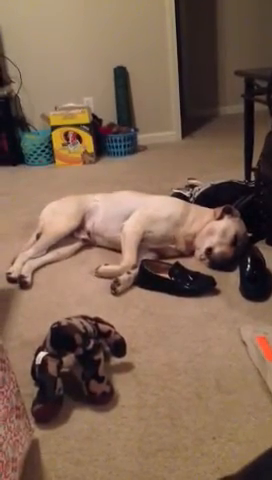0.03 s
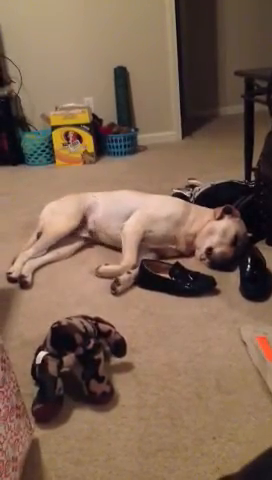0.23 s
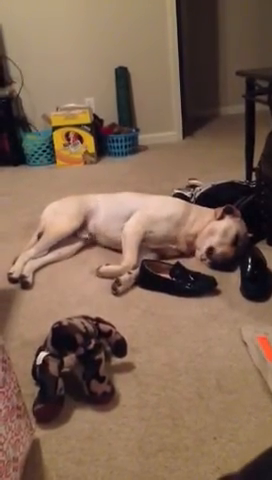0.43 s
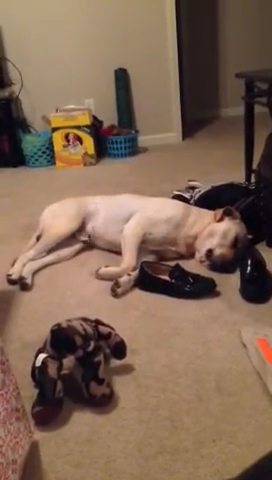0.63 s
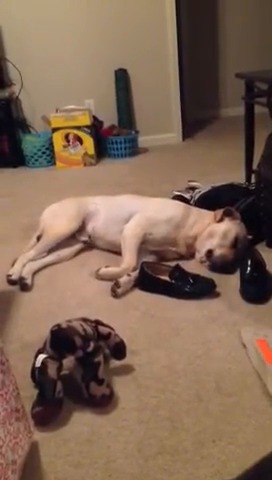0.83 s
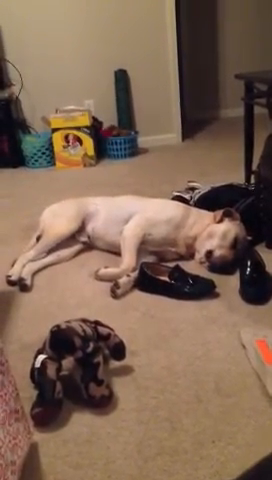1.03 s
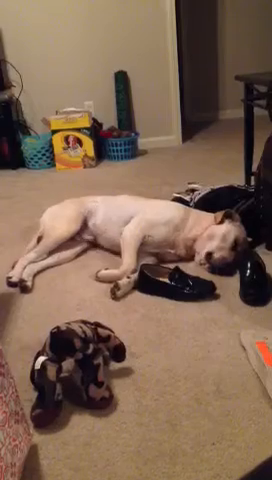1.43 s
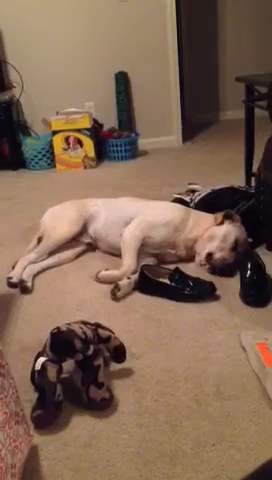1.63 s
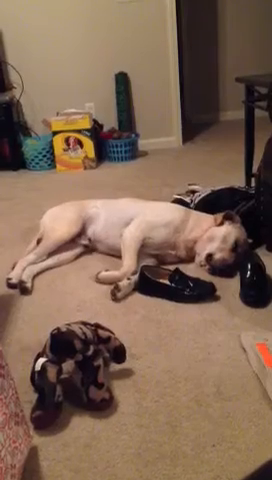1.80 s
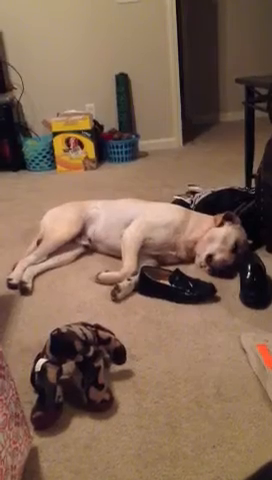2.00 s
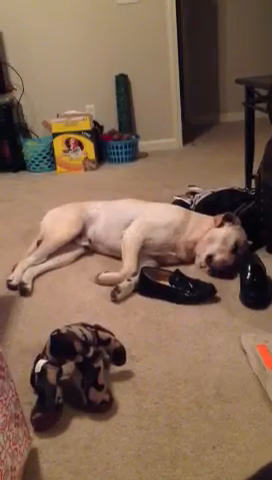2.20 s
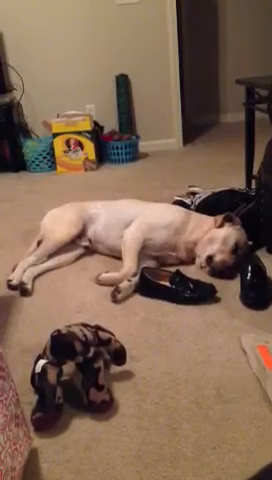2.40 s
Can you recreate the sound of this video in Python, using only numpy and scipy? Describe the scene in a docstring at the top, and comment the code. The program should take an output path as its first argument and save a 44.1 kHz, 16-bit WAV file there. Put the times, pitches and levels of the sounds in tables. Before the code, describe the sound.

Two muffled dog woofs trail into nose puffs over faint room hiss.

```python
"""A quiet room hisses steadily. At 0.2 s a dog asleep on a carpet woofs through its closed mouth:
a short, muffled, rising yelp that sets the walls ringing for half a second. The voice breaks off
into puffs of air through the nose, and the lips flap. At 1.4 s a second woof breaks off into puffs,
the nose whistles briefly, and the room rings out again."""
import sys
import numpy as np
from scipy import signal
from scipy.fft import rfft, irfft
from scipy.io import wavfile

SR = 44100
rng = np.random.default_rng(int(sys.argv[2]) if len(sys.argv) > 2 else 0)


def waveform_to_disk(signal):
    """Save audio, clipped to [-1, 1], as 16-bit WAV at the path in sys.argv[1]."""
    frames = np.transpose(np.atleast_2d(signal))
    scaled = np.clip(frames, -1, 1) * 32767
    samples = np.round(scaled).astype(np.int16)
    wavfile.write(sys.argv[1], SR, samples)


N = 112454


def amp(db):
    """Decibels to gain."""
    return 10 ** (np.asarray(db) / 20)


def unit_rms(x):
    """Scales to rms 1."""
    return x / np.sqrt(np.mean(x ** 2) + 1e-20)


def lookup(table, hz):
    """Interpolates a table on a log-frequency axis."""
    freq_hz, value = np.transpose(table)
    return np.interp(np.log(hz + 1), np.log(freq_hz + 1), value)


def add(mix, start_s, sound):
    """Mixes a sound in at start_s."""
    part = mix[round(start_s * SR):][:len(sound)]
    part += sound[:len(part)]


def noise(spectrum):
    """Noise of a given spectral shape, rms 1."""
    gain = amp(lookup(spectrum, np.fft.rfftfreq(N, 1 / SR)))
    return unit_rms(irfft(rfft(rng.standard_normal(N)) * gain, N))


def wander(cutoff_hz):
    """Low-passed random motion, rms 1."""
    rolloff = (1 + (np.fft.rfftfreq(N, 1 / SR) / cutoff_hz) ** 2) ** 2
    return unit_rms(irfft(rfft(rng.standard_normal(N)) / rolloff, N))


def hiss():
    """Steady noise floor of the room."""
    # hiss shape: freq_hz, density_db
    spectrum = [(30, -20.5), (90, -9), (167, -1), (300, -2), (450, -3), (570, -7), (750, -8.5), (1500, -8),
                (1830, -7.5), (2150, -10), (2700, -7.5), (8000, -10), (15000, -11.5)]
    return amp(-66.5) * noise(spectrum)


def woofs():
    """Voice through a closed mouth: strong fundamental, muffled overtones, gruff noise in the throat."""
    # voice contour per woof: time_s, pitch_hz, level_db, overtones_db, roughness
    contours = [
        [(.205, 503.5, -60, -1, 0.06), (.219, 536, -42, 0.5, 0.25), (.235, 569.5, -38, -0.5, 0.14),
         (.242, 734.9, -34, 0, 0.16), (.254, 790.6, -25.5, 2.5, 0.16), (.265, 873.5, -26.5, -4, .12),
         (.273, 857.3, -23.5, 3, 0.17), (.278, 745, -30.5, -0.5, 0.14), (.281, 689.8, -31.5, -2.5, 0.3)],
        [(1.379, 410, -61, -3.5, 0.19), (1.385, 401.3, -37, 0, 0), (1.396, 364, -30, -7.5, 0.03),
         (1.407, 393.9, -27.5, -3.5, 0.08), (1.419, 428.2, -32.5, 7, 0), (1.431, 476.5, -32.5, 4, 0.19),
         (1.437, 562.4, -38.5, 9, 0.27), (1.442, 713, -31, -6.5, 0.31), (1.453, 601.6, -36.5, 5.5, 0.19),
         (1.463, 706.7, -39, 4.5, 0.29), (1.474, 572.4, -43.5, -4.5, 0.03)],
    ]
    # throat and muzzle response per woof: freq_hz, gain_db
    throats = [
        [(1050, -14.5), (1400, -30), (1580, -26.5), (1730, -9.5), (2000, -20), (2350, -16.5), (2700, -34),
         (3000, -25), (3350, -21.5), (3700, -29), (4200, -29), (4800, -45)],
        [(750, -16), (900, -7.5), (1150, -13), (1420, -27.5), (1700, -14), (2100, -19), (2600, -27.5),
         (3600, -43.5)],
    ]
    # low throat noise: freq_hz, density_db
    gruff_spectrum = [(400, -45), (520, -5), (680, 3), (800, -1), (1000, -44)]
    jitter_depth, jitter_hz, rasp_depth, rasp_hz = .06, 209.47, .6, 199.82
    slope_db_per_octave, gruff_db, fade_s = -10.5, -3, 0.0042
    t, out = np.arange(N) / SR, np.zeros(N)
    for contour, throat in zip(contours, throats):
        time_s, *columns = np.transpose(contour)
        pitch_hz, level_db, overtones_db, roughness = (np.interp(t, time_s, c) for c in columns)
        jitter = 1 + jitter_depth * roughness * wander(jitter_hz)
        phase = 2 * np.pi * np.cumsum(pitch_hz * jitter) / SR
        voice = np.zeros(N)
        for k in range(1, 8):
            harmonic_db = lookup(throat, k * pitch_hz) + overtones_db + slope_db_per_octave * np.log2(k / 2)
            gain = 1 if k == 1 else amp(harmonic_db)
            rasp = 1 + rasp_depth * roughness * wander(rasp_hz)
            voice += gain * np.sin(k * phase) * rasp
        voice += amp(gruff_db) * roughness * noise(gruff_spectrum)
        outside_s = t - np.clip(t, time_s[0], time_s[-1])
        out += np.sqrt(2) * voice * amp(level_db) * np.exp(-(outside_s / fade_s) ** 2)
    return out


def room(source):
    """Dense wall reflections, each band dying at its own rate, with a few distinct echoes among them."""
    # wall ring decay: freq_hz, t60_s
    decay_times = [(150, 0.0007), (400, 0.5947), (650, 0.5619), (850, 0.5554), (1100, 0.6488),
                   (1700, 0.6141), (3000, 0.3875), (8000, 0.7192)]
    # wall ring strength: freq_hz, gain_db
    ring_gains = [(150, -8.5), (400, -6), (520, -8), (680, -5), (850, -10), (1100, -10.5), (1700, -11),
                  (3000, -9.5), (8000, -5)]
    # floor and furniture echoes: delay_s, gain_db
    echoes = [(.012, -19.5), (.0255, -12), (.056, -18)]
    predelay_s, build_s = .007, 0.01
    hz, t, bands = signal.stft(rng.choice([-1., 1.], SR), SR, nperseg=256)
    decay_per_s = np.log(1000) / lookup(decay_times, hz)[:, None]
    envelope = np.exp(-decay_per_s * t) * np.sqrt(2 * decay_per_s / SR)
    gain = amp(lookup(ring_gains, hz))[:, None]
    tail = signal.istft(bands * envelope * gain, SR, nperseg=256)[1]
    tail *= np.clip(np.arange(len(tail)) / SR / build_s, 0, 1)
    out = np.zeros(N)
    add(out, predelay_s, signal.fftconvolve(source, tail))
    for delay_s, gain_db in echoes:
        add(out, delay_s, amp(gain_db) * source)
    return out


def nose_puffs():
    """Air rushes through the muzzle and the resonances of the nose, swelling and dying away."""
    # puffs of air: peak_s, rise_s, fall_s, level_db, nasal_db
    puffs = [(.252, 0.0152, 0.07458, -55.5, -10), (.344, 0.024914, 0.03858, -48, -3.5),
             (0.369, 0.004, 0.03722, -60, -6), (.415, 0.01115, 0.03216, -58, -9.5),
             (1.444, 0.00642, 0.01192, -50, -14), (1.492, 0.0306, 0.06699, -55.5, -10.5)]
    # rushing air: freq_hz, density_db
    air_spectrum = [(100, -6.5), (200, 0.5), (450, 2), (800, 3), (1000, -8), (1200, 2), (1450, -5.5),
                    (1750, 0.5), (2100, -1), (2550, -2.5), (4000, -14), (5800, -14.5), (7200, -16),
                    (8500, -16), (10500, -24.5), (15000, -30)]
    # ring of the nasal passages: freq_hz, density_db
    nasal_spectrum = [(1900, -39), (2550, -1), (2850, -9.5), (3250, -2.5), (3900, -23.5), (5000, -47.5)]
    air, nasal = noise(air_spectrum), noise(nasal_spectrum)
    t, out = np.arange(N) / SR, np.zeros(N)
    for peak_s, rise_s, fall_s, level_db, nasal_db in puffs:
        swell = np.exp(-np.maximum((peak_s - t) / rise_s, 0) ** 2)
        decay = np.exp(-np.maximum((t - peak_s) / fall_s, 0))
        out += amp(level_db) * swell * decay * (air + amp(nasal_db) * nasal)
    return out


def lip_flaps():
    """Each flap is a low, quickly damped thud."""
    # soft flaps: start_s, level_db
    flaps = [(0.315, -42.5), (0.354, -54.5), (.371, -34), (.428, -68.5)]
    # lip modes: freq_hz, gain_db, t60_s
    modes = [(175.77, 0.5, 0.05433), (259.06, -0.5, 0.039)]
    rise_s = 0.0048
    t, out = np.arange(SR // 8) / SR, np.zeros(N)
    ring = sum(amp(db - 60 * t / t60_s) * np.sin(2 * np.pi * hz * t) for hz, db, t60_s in modes)
    thud = (1 - np.exp(-(t / rise_s) ** 2)) * ring
    for start_s, level_db in flaps:
        add(out, start_s, amp(level_db) * thud)
    return out


def nose_whistle():
    """A nostril narrows and sings one brief, pure note."""
    start_s, length_s, pitch_hz, level_db = 1.507, 0.016862, 3000, -40.5
    t, out = np.arange(0, length_s, 1 / SR), np.zeros(N)
    envelope = amp(level_db) * np.sin(np.pi * t / length_s)
    add(out, start_s, envelope * np.sqrt(2) * np.sin(2 * np.pi * pitch_hz * t))
    return out


def scene():
    """Room hiss, the dog and its reflections; mono."""
    dog = woofs() + nose_puffs() + lip_flaps() + nose_whistle()
    return (dog + room(dog) + hiss())[None]


def record(dry):
    """Microphone bass cut and treble band limit."""
    low_hz, high_hz = 109.37, 15350
    highpass = signal.butter(4, low_hz, "highpass", fs=SR, output="sos")
    lowpass = signal.firwin(511, high_hz, window=("kaiser", 9), fs=SR)
    return signal.oaconvolve(signal.sosfilt(highpass, dry), lowpass[None], "same")


dry = scene()
out = record(dry)
waveform_to_disk(out)
```